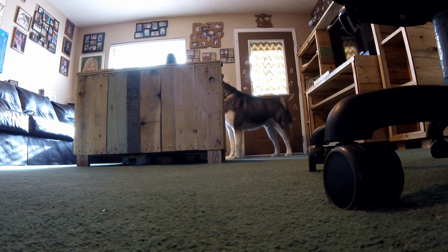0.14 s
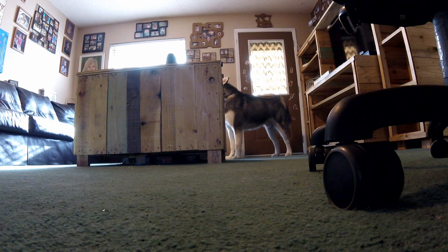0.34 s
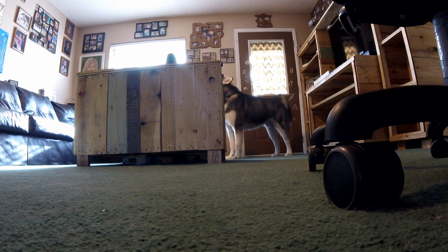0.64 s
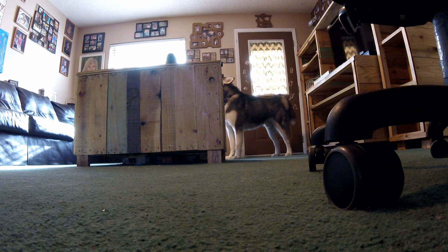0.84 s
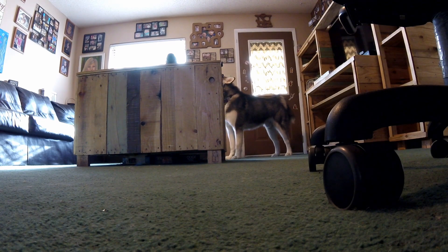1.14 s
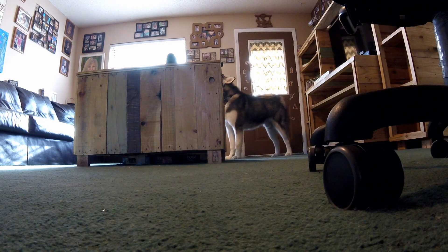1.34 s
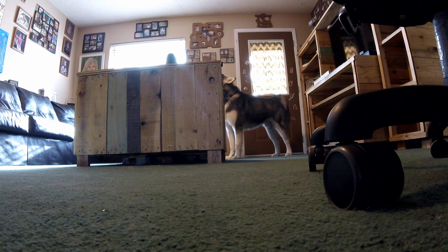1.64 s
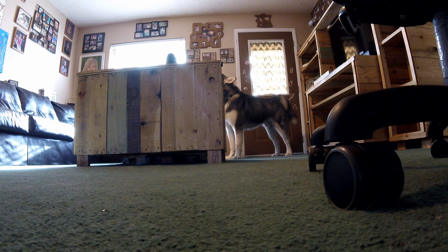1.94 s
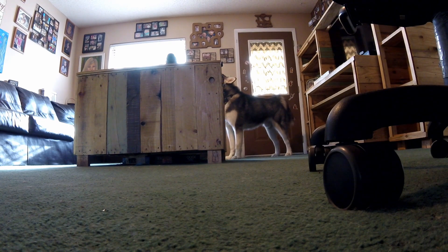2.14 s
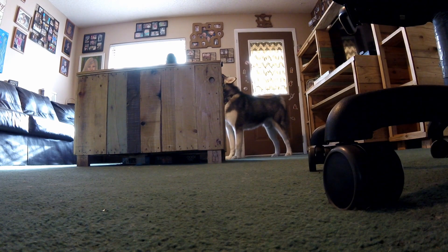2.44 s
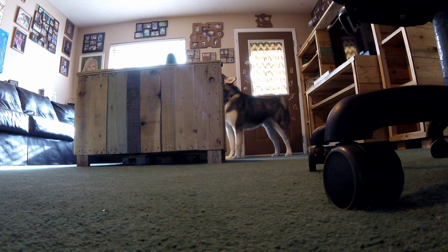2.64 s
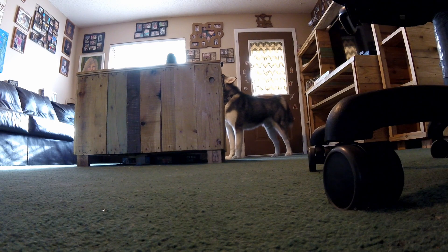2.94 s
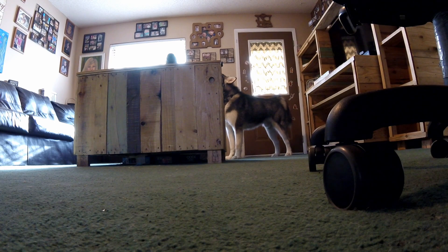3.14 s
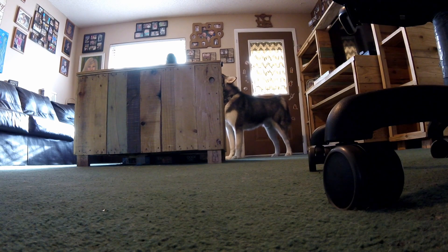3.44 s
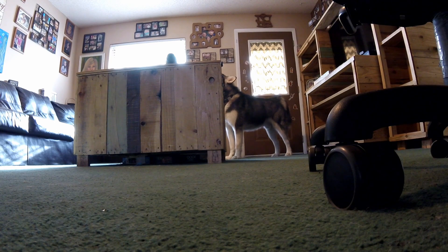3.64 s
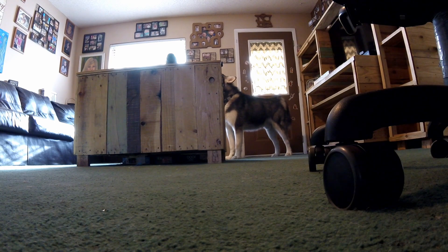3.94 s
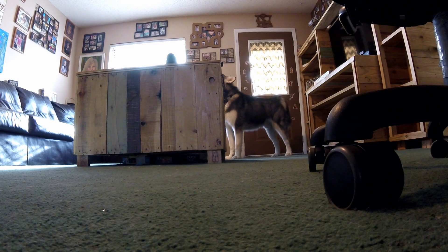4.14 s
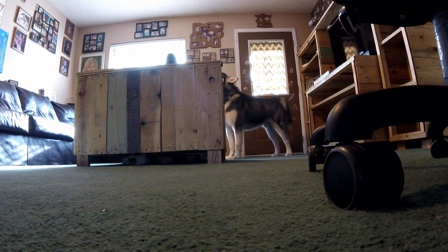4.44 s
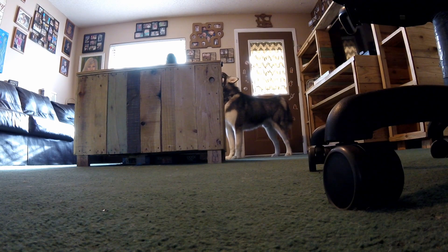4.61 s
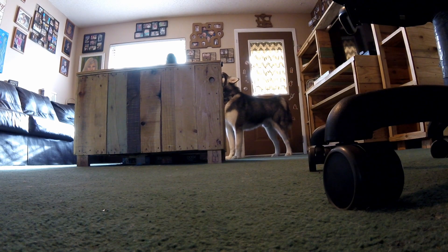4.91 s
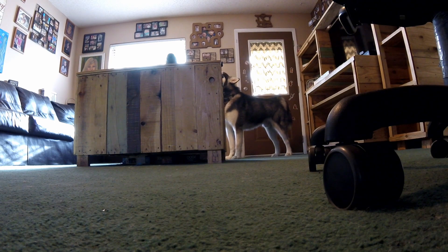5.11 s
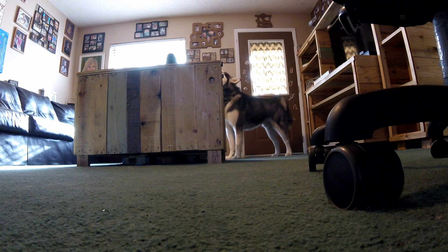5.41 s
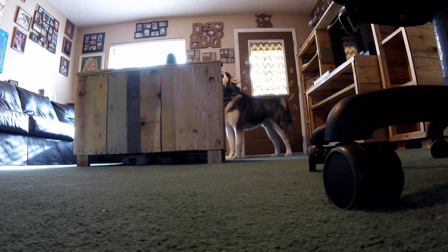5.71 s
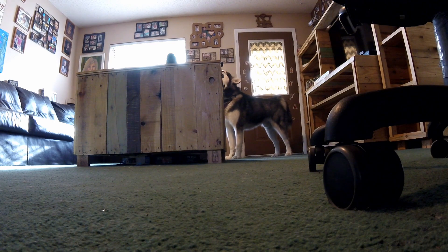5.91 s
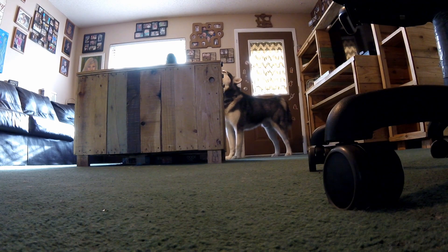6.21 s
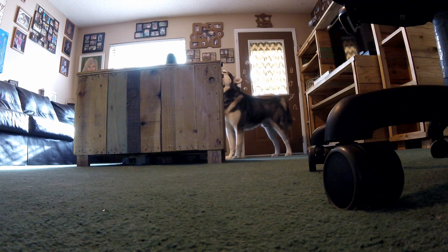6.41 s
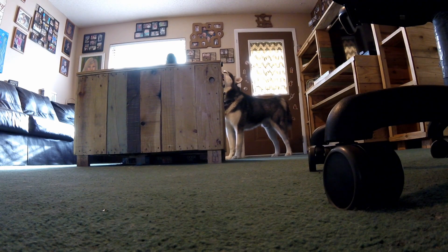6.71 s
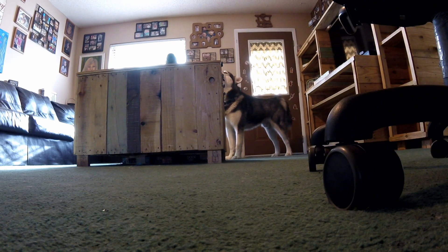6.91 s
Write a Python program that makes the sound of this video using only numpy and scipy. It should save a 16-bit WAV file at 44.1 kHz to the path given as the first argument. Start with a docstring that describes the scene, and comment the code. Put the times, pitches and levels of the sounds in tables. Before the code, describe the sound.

A large dog indoors howls long and high, pauses, then growls gruffly into a second, shorter howl that slides down, over low room rumble.

```python
"""A large dog across a carpeted living room, heard by a microphone on the floor over low rumble and faint hiss.
The first howl, a stack of harmonics with puffs of air, swoops up, holds and falls; a faint tick is near its start.
After a pause and another tick, a growl of uneven flaps ringing in chest, throat and mouth swells up.
It breaks into the second howl, where lines halfway between the harmonics add an undertone, and slides down.
Each strong harmonic swells and dips as it slides through the room's standing waves."""
import sys
import numpy as np
from scipy import signal
from scipy.fft import rfft, irfft, next_fast_len
from scipy.io import wavfile
from scipy.ndimage import uniform_filter1d

SR = 44100
rng = np.random.default_rng(int(sys.argv[2]) if len(sys.argv) > 2 else 0)


def generate_wav(signal):
    """Clip the signal to [-1, 1] and save it as 16-bit WAV at the path in sys.argv[1]."""
    frames = np.transpose(np.atleast_2d(signal))
    scaled = np.clip(frames, -1, 1) * 32767
    pcm = np.round(scaled).astype(np.int16)
    wavfile.write(sys.argv[1], SR, pcm)


N = 311346
TIME = np.arange(N) / SR


def undb(db):
    """Decibels to gain."""
    return 10 ** (np.asarray(db) / 20)


def unit(x):
    """Scale to rms 1."""
    return x / np.sqrt(np.mean(x ** 2))


def curves(table):
    """Each column of a table after the first as a curve over time."""
    s, *columns = np.transpose(table)
    return [np.interp(TIME, s, column) for column in columns]


def bumps(table):
    """Brief rises or dips in dB from rows of (time, length, height)."""
    return sum(db * np.exp(-((TIME - s) / length) ** 2) for s, length, db in table)


def sounding(table, fade_s):
    """1 over the span of a table, fading to 0 outside it."""
    inside_s = np.minimum(TIME - table[0][0], table[-1][0] - TIME)
    return np.clip(1 + inside_s / fade_s, 0, 1)


def gain_at(hz, colour):
    """Gain of a (Hz, dB) spectrum at the given frequencies."""
    points, db = np.transpose(colour)
    return undb(np.interp(np.log(hz + 1e-9), np.log(points), db))


def noise(colour):
    """Noise of rms 1 with the given spectrum."""
    size = next_fast_len(N)
    gain = gain_at(np.fft.rfftfreq(size, 1 / SR), colour)
    return unit(irfft(rfft(rng.standard_normal(size)) * gain, size)[:N])


def waver(rate_hz):
    """Smooth chance of rms 1, up to about the given rate."""
    lowpass = signal.butter(4, rate_hz, fs=SR, output="sos")
    return unit(signal.sosfilt(lowpass, rng.standard_normal(N)))


def ring(x, hz, width):
    """A resonance with steep skirts, its edges centred geometrically on hz."""
    low = np.sqrt(hz ** 2 + width ** 2 / 4) - width / 2
    bandpass = signal.butter(3, [low, low + width], "bandpass", fs=SR, output="sos")
    return signal.sosfilt(bandpass, x)


def room(x, wet_db, t60=0.61):
    """Direct sound and the dense echoes of a furnished room, as an impulse response of unit energy."""
    t = TIME[:SR * 3 // 4]
    echoes = rng.standard_normal(len(t)) * np.exp(-np.log(1000) * t / t60) * (t > .004)
    response = undb(wet_db) * echoes / np.sqrt(np.sum(echoes ** 2))
    response[0] = 1
    return signal.fftconvolve(x, response / np.sqrt(np.sum(response ** 2)))[:N]


# spectrum of the quiet room: freq_hz, relative_level_db
ROOM_TONE = [(28, -5.5), (43, 4), (58, -1.5), (90, -12.5), (140, -18.5), (280, -26), (600, -33.5),
             (3100, -54), (4300, -57.5), (5600, -54.5), (6700, -42), (9200, -58)]
ROOM_TONE_DB = -36


def room_tone():
    """Shaped noise: a wavering low rumble with faint hiss."""
    return noise(ROOM_TONE) * undb(ROOM_TONE_DB + 0.5 * waver(17.0))


# peaks and nulls of the room's standing waves at the floor: freq_hz, width_hz, height_db
STANDING_WAVES = [(243.4, 4.5, 11), (279.3, 2.1, 3.5), (297.6, 7.2, 6), (317.5, 2.63, -11), (389, 4, 4.5),
                  (438.7, 2.8, -21), (471.9, 11.1, -19), (497.6, 6, 9), (527.3, 7.4, 9), (558.4, 12.2, 9.5),
                  (597, 4.5, 9.5), (692, 2, -5.5), (719.5, 3.7, -17), (747.5, 22, -15), (770, 5.5, -21.5),
                  (861, 1.6, -18), (913.6, 11, -9), (945.5, 7.7, 10.5), (989, 1.5, 10.5), (1007, 2.9, 14),
                  (1033, 5.6, -19)]
ROOM_LAG_S = .008  # the room needs a moment to follow a sliding tone


def standing_waves(hz):
    """What the room adds to or takes from a tone as it slides, in dB."""
    grid = np.linspace(hz.min(), hz.max(), SR // 10)
    grid_db = sum(db * np.exp(-((grid - centre) / width) ** 2) for centre, width, db in STANDING_WAVES)
    db = np.interp(hz, grid, grid_db)
    lag = int(ROOM_LAG_S * SR)
    return uniform_filter1d(uniform_filter1d(db, lag), lag)


def trail(tone, hz, rough):
    """A held tone merges with its echoes; when it slides away they ring on at the old pitch and beat against it."""
    glide = uniform_filter1d(np.abs(np.gradient(np.log(hz))) * SR, SR // 8)
    share = np.clip(.4 * glide + .9 * rough, 0, .3)
    return tone * np.sqrt(1 - share ** 2) + share * room(tone, wet_db=22.0)


def strong_harmonics(phase, hz, level_db, second_db, third_db):
    """The three strong harmonics of the folds, each coloured by the standing waves, with the undertone."""
    body = undertone(phase)
    for k, db in enumerate([0, second_db, third_db], 1):
        body = body + undb(level_db + db + standing_waves(k * hz)) * np.sin(k * phase)
    return np.sqrt(2) * body


def overtones(phase, orders, gain):
    """Harmonics of the folds, weighted by gain(order); each swells and fades as the head moves in the room."""
    sway_db = 2.5
    steps = np.arange(len(phase)) / (SR // 9)
    knots = np.arange(int(steps[-1]) + 2)
    out = 0
    for k in orders:
        sway = undb(sway_db * np.interp(steps, knots, rng.standard_normal(len(knots))))
        out = out + sway * gain(k) * np.sin(k * phase + rng.uniform(0, 2 * np.pi))
    return np.sqrt(2) * out


# colour of the overtones through the throat: freq_hz, gain_db
TRACT = [(750.0, 11.5), (950.0, 12), (1050.0, 9), (1105.0, 6), (1165.0, -5.5), (1390.0, 2.4), (1480.0, -12),
         (1600.0, -0.5), (1750.0, 2), (1920.0, -2), (2030, -10), (2110.0, -2.5), (2180, -5.5),
         (2300.0, -3.5), (2440.0, -15.5), (2580.0, -21), (2900.0, -22), (3400, -39.5)]
# level of the throat's overtones: time_s, level_db
THROAT_LEVEL = [(0.0, -53), (0.17, -46.5), (0.42, -54), (0.86, -56), (1.3, -53), (1.9, -48), (2.3, -48.5),
                (2.8, -53), (3.1, -51.5), (3.42, -60.5), (3.6, -81), (4.72, -58), (5.5, -51.5), (6.0, -49),
                (6.3, -51.5), (7.06, -59.5)]
# the resonance that the lips move: time_s, freq_hz, height_db
LIPS = [(.2, 1950, 8.5), (.6, 2420, -3), (1.1, 2413, 24.5), (2.1, 2375, 5.5), (2.75, 2286, 16),
        (3.2, 2220, 10), (3.42, 1783, 10), (4.72, 2310, 15.5), (5.5, 2310, 16), (5.9, 2280, 11),
        (6.75, 2277, 11), (6.88, 1980, 24)]
# the fourth harmonic flares as each howl breaks downwards: time_s, length_s, height_db
FLARES = [(2.955, .03, 17), (6.25, .05, 15)]


def throat(phase, hz, on, halves):
    """Overtones above the third light up one after another as they slide through the resonances."""
    lips_hz, lips_db = (column[on] for column in curves(LIPS))
    lips_width_hz = 160
    flare = undb(bumps(FLARES)[on])

    def tract(k):
        lips = undb(lips_db * np.exp(-((k * hz[on] - lips_hz) / lips_width_hz) ** 2))
        return gain_at(k * hz[on], TRACT) * lips * (flare if k == 4 else 1)

    whole = overtones(phase[on], range(4, 14), tract)
    between = overtones(phase[on], [k + .5 for k in range(3, 9)], lambda k: tract(k) * (k / 7.5) ** 2)
    return undb(curves(THROAT_LEVEL)[0][on]) * (whole + halves * between)


# colour of the highest overtones through the muzzle: freq_hz, gain_db
MUZZLE = [(3500, -43.5), (4050, -15.5), (4230, -1.5), (4520, -4), (4750, -11.5), (5100, -9.5), (5550, -29),
          (5950, 6), (6400, -14.5), (6900, -37), (7300, -14), (7700, -25.5), (8100, -12.5), (8600, -41.5)]
# level of the muzzle's ring: time_s, level_db
MUZZLE_LEVEL = [(0, -76), (.2, -56.5), (1.3, -54.5), (2.5, -51.5), (3.5, -75), (4.72, -62), (5.7, -52.5),
                (6.2, -56), (6.7, -72)]


def muzzle(phase, hz, on, halves):
    """The highest overtones ring in the muzzle, pulsing every second cycle when the cycles alternate."""
    tones = overtones(phase[on], range(10, 38), lambda k: gain_at(k * hz[on], MUZZLE))
    pulsing = 1 + halves * np.sin(phase[on] / 2)
    return undb(curves(MUZZLE_LEVEL)[0][on]) * tones * pulsing


# spectrum of the breath: freq_hz, relative_level_db
AIR_COLOUR = [(1400, -8.5), (2200, 11), (3500, 4.5), (4900, 4), (5600, -2.5), (6200, 2), (8400, -8.5),
              (9500, -22.5)]


def air():
    """Turbulence in the dog's open mouth, each band fluttering on its own."""
    flutter_db = 4.5
    stream = noise(AIR_COLOUR)
    bands = [ring(stream, hz, 1000) * undb(flutter_db * waver(25)) for hz in range(1500, 9000, 1000)]
    return unit(sum(bands))


def breath(phase, rough, air_db):
    """Air and hoarse noise escape once a cycle, while the folds are open."""
    hoarse_hz, hoarse_width_hz, hoarse_db = 2100, 650, -8  # the mouth's resonance
    hoarse = unit(ring(rng.standard_normal(N), hoarse_hz, hoarse_width_hz))
    hoarse = undb(hoarse_db) * rough ** 2 * hoarse
    opening = (1 + np.sin(phase)) ** 2 / 2
    return ((undb(air_db) + puffs()) * air() + hoarse) * opening


# roughness of the folds, least while a high note is held: time_s, roughness_db
ROUGHNESS = [(.45, -27), (.62, -22), (1.1, -31), (2.8, -34.5), (2.95, -27), (4.75, -19.5), (5.25, -24),
             (6.03, -34), (6.14, -27.5), (7.06, -27)]
# the voice catches for an instant just after it finds its tone: time_s, length_s, height_db
CATCH = [(4.872, .009, -15)]
# each howl, before the room colours it:
# time_s, pitch_hz, level_db, second_over_first_db, third_over_first_db
FIRST_HOWL = [(0.0, 311, -41, 5.5, 0), (0.04, 275.2, -38, 6.5, -4.5), (0.17, 277.7, -37.5, 13.5, -3),
              (0.21, 283.4, -36, 2.5, 0), (0.27, 294, -30.5, -10.5, -7), (0.39, 305.2, -21.5, 10, -3.5),
              (0.5, 314, -15.5, -0.3, -16.5), (0.62, 325.2, -13, -5.5, -28),
              (0.72, 326.6, -11.5, -3.8, -35.5), (0.84, 332, -15, -5.5, -34.5),
              (1.0, 336.6, -7.5, -19.5, -42), (1.15, 340.9, -9.5, -10.5, -35),
              (1.42, 344.4, -8, -9.5, -23.5), (1.64, 347.7, -3, -13, -35), (1.88, 353.8, -4, -14, -37),
              (2.19, 344.8, -3, -12.5, -26), (2.4, 349.7, -2.5, -15, -28.5), (2.55, 342.4, -7, -10, -12.5),
              (2.66, 336, -6.5, -15, -28.5), (2.78, 328.8, -12, -5.5, -13.5), (2.88, 326.1, -11, -2.5, -19),
              (2.96, 281.8, -25.5, 0.2, -12), (3.08, 260.7, -23.5, -13, -4.5), (3.22, 249.6, -35, 6.5, 7),
              (3.36, 231, -36.5, 8, 7), (3.48, 218, -35, 6.5, -8), (3.6, 216.3, -59, 12.5, 5)]
SECOND_HOWL = [(4.72, 257, -27, 7, 4), (4.77, 284, -16.5, 1.5, -17.5), (4.84, 281.2, -16, 0, -9.5),
               (4.872, 275, -14, -3.5, -11), (4.91, 287.4, -17.5, 6.5, -8), (5.18, 290.1, -27, 15.5, 3.5),
               (5.32, 286.3, -17, -1, -9), (5.42, 294.6, -30.5, 10, -3.5), (5.5, 302.8, -13, -13.5, 2.7),
               (5.62, 310.9, -10, -8.5, -9.5), (5.71, 304.8, -10.5, -12, -4.5),
               (5.86, 322.8, -8.5, -3, -24.5), (6.02, 316.6, -8, -1.9, -19), (6.08, 304.4, -13, -8.5, -6),
               (6.15, 290.6, -24, -13.5, -10.5), (6.2, 272.6, -18, -6.5, -18), (6.29, 253.1, -20, -14.5, 3),
               (6.4, 243.5, -32.5, 3, 12.5), (6.52, 238.8, -28.5, 21.5, 5.5),
               (6.62, 226.5, -27.5, -2.5, 1.5), (6.73, 213.7, -33.5, 6.5, -1), (6.85, 202.7, -27, 0, -23.5),
               (7.06, 190.1, -30, 0.5, -14)]


def howl(table, air_db, quaver=0.0018, jitter=.05, shimmer=0.55):
    """Vibrating folds give harmonics and let out a stream of air. Returns (body, treble)."""
    hz, level_db, second_db, third_db = curves(table)
    rough = undb(curves(ROUGHNESS)[0])
    unsteady_hz = hz * (1 + quaver * waver(20) + jitter * rough * waver(110))
    phase = 2 * np.pi * np.cumsum(unsteady_hz) / SR
    voiced = sounding(table, 0.03) * undb(bumps(CATCH)) * (1 + shimmer * rough * waver(360))
    body = strong_harmonics(phase, hz, level_db, second_db, third_db)
    on = voiced != 0
    halves = half_lines()[on]
    high = np.zeros(N)
    high[on] = throat(phase, hz, on, halves) + muzzle(phase, hz, on, halves)
    treble = (high + breath(phase, rough, air_db)) * voiced
    return trail(body * voiced, hz, rough), treble


# faint ticks: start_s, level_db
TICKS = [(.041, -46), (4.018, -55)]


def ticks():
    """Tiny clicks: noise that starts at once and dies away within milliseconds."""
    envelope = sum(undb(db) * np.exp(-np.abs(TIME - s) / .003) * (TIME >= s) for s, db in TICKS)
    return envelope * noise([(2500, 6.5), (4000, -21.5), (7000, -13.0), (10000, -15.0)])


# puffs of air as the first howl gets going, before they sputter: time_s, length_s, level_db
PUFFS = [(.06, .05, -49), (.22, .15, -55), (.58, .12, -54), (.74, .08, -51), (.85, .09, -47),
         (.98, .05, -49)]


def puffs():
    """Strength of the short, sputtering puffs of air before the voice settles."""
    sputter = undb(3 * waver(45) - 1)
    return sputter * sum(undb(db) * np.exp(-(2 * (TIME - s) / length) ** 2) for s, length, db in PUFFS)


# the growl sets in, swells to its peak while the flapping speeds up, and dies under the howl
GROWL_START_S, GROWL_PEAK_S, GROWL_END_S = 4.166, 4.647, 4.75
GROWL_ATTACK_S, GROWL_SAG_DB_PER_S, GROWL_RELEASE_S = 0.06, 60, 0.057
FLAP_HZ, FLAP_RISE_HZ_PER_S, IRREGULARITY_PER_S = 75, 105, .25
BARK_S, BARK_LENGTH_S = 4.25, 0.056  # a short bark early in the growl
# resonances, one list per part of the growl: freq_hz, width_hz, relative_level_db
GROWL_MODES = [
    [(84.4, 61, -1)],
    [(240, 160, 0)],
    [(376, 112, 0)],
    [(568.5, 72, 3.5)],
    [(687, 102, 0)],
    [(946, 120, 0)],
    [(1900, 480, -6), (2205, 240, 3)],
    [(3030, 180, -5), (4560, 210, 5.5), (6370, 300, -2.5)],
]
# flutter, chest, low throat, high throat, bark, mouth, rasp, muzzle:
# peak_level_db, swell_db_per_s, lift_in_bark_db
GROWL_PARTS = [(-43.5, -42, -5), (-24, 16, -7), (-16, 24, -3.5), (-15, 61.5, 6), (-31.5, 15, 9),
               (-29.5, 74.5, 6), (-47, 35.5, 2), (-56, 35, 2)]


def growl(hiss=0.005):
    """Slack folds flap unevenly and ever faster; each flap rings chest, throat and mouth in shifting shares."""
    scatter_db, patchy_db, echo_db = 3, 1, 5
    growling_s = np.clip(TIME, GROWL_START_S, GROWL_END_S)
    age_s = growling_s - GROWL_START_S
    hz = FLAP_HZ + FLAP_RISE_HZ_PER_S * age_s
    cycles = np.cumsum(hz * (1 + IRREGULARITY_PER_S * age_s * waver(70))) / SR
    flaps = np.diff(np.floor(cycles), prepend=0) * undb(scatter_db * rng.standard_normal(N))
    breath_noise = hiss * np.exp(-3 * (cycles % 1)) * rng.standard_normal(N)
    source = room(flaps + breath_noise, wet_db=echo_db)
    bark = np.exp(-((TIME - BARK_S) / BARK_LENGTH_S) ** 2)
    before_peak = np.maximum(GROWL_PEAK_S - growling_s, 0)
    after_peak = np.maximum(growling_s - GROWL_PEAK_S, 0)
    out = 0
    for modes, (peak_db, swell, bark_db) in zip(GROWL_MODES, GROWL_PARTS):
        band = sum(undb(mode_db) * ring(source, centre, width) for centre, width, mode_db in modes)
        steady = band / np.sqrt(uniform_filter1d(band ** 2, SR // 14) + 1e-18)  # short-term rms 1
        db = peak_db - swell * before_peak - GROWL_SAG_DB_PER_S * after_peak
        out = out + undb(db + bark_db * bark + patchy_db * waver(14)) * steady
    attack = np.clip((TIME - GROWL_START_S) / GROWL_ATTACK_S, 0, 1)
    return out * attack * np.exp(-np.maximum(TIME - GROWL_END_S, 0) / GROWL_RELEASE_S)


# single hard flaps within the growl: start_s, strength_db
HARD_FLAPS = [(4.168, -28), (4.333, -15), (4.436, -13), (4.498, -12), (4.529, -13), (4.562, -11),
              (4.621, -7), (4.699, -11)]
# what a hard flap rings with, before the low-pass dulls it: freq_hz, ring_down_s, level_db
FLAP_MODES = [(410, 0.0084, -8.5), (582.3, 0.031, -8), (690, 0.0076, -20), (990, 0.0048, -19.5)]


def hard_flaps():
    """Single hard slaps of the folds knock dully on the throat's resonances."""
    t = TIME[:SR // 10]
    knock = sum(undb(db) * np.exp(-t / decay) * np.sin(2 * np.pi * hz * t) for hz, decay, db in FLAP_MODES)
    knock = signal.sosfilt(signal.butter(8, 900, fs=SR, output="sos"), knock)
    slaps = np.zeros(N)
    for s, db in HARD_FLAPS:
        slaps[int(s * SR)] = undb(db)
    return room(signal.fftconvolve(slaps, knock)[:N], wet_db=-7)


# lines halfway between the overtones while the cycles alternate: time_s, gain_over_overtones_db
HALF_LINES = [(4.7, -40), (4.85, -9), (5.5, 0), (5.72, -1), (5.85, -26)]


def half_lines():
    """Strength of the alternation between cycles, as heard among the overtones."""
    return undb(curves(HALF_LINES)[0])


UNDERTONE_S, UNDERTONE_ATTACK_S, UNDERTONE_HOLD_S = 4.82, 0.12, 0.38
UNDERTONE_DB, UNDERTONE_FADE_DB_PER_S = -27.5, 37.5


def undertone(phase):
    """As the growl breaks into tone, alternating cycles put lines at 1/2, 3/2 and 5/2 of the pitch."""
    age = TIME - UNDERTONE_S
    fading_s = np.maximum(age - UNDERTONE_ATTACK_S - UNDERTONE_HOLD_S, 0)
    attack = np.clip(age / UNDERTONE_ATTACK_S, 0, 1)
    gain = attack * undb(UNDERTONE_DB - UNDERTONE_FADE_DB_PER_S * fading_s)
    lines = np.sin(3 * phase / 2) + undb(-23.0) * np.sin(phase / 2) + undb(-19.0) * np.sin(5 * phase / 2)
    return gain * lines


def scene():
    """The dog stands across the room; its overtones arrive with strong echoes, slightly to one side."""
    body1, high1 = howl(FIRST_HOWL, air_db=-75.5)
    body2, high2 = howl(SECOND_HOWL, air_db=-81.0)
    low = room_tone() + body1 + body2 + growl() + hard_flaps()
    high = room(high1 + high2 + ticks(), wet_db=-1, t60=.42)
    pan_db = -1.1  # first channel over second
    return low + high * undb(np.array([[pan_db], [-pan_db]]) / 2)


KNEE_DB, WINDOW_S = -12, .5  # level where the gain starts to sink, span over which it is averaged


def gain_control(x):
    """The gain sinks as the sound gets louder, so the rumble ducks under the howls."""
    window = np.hanning(int(WINDOW_S * SR))
    power = np.abs(signal.fftconvolve(np.mean(x ** 2, axis=0), window / window.sum(), "same"))
    return x / np.sqrt(np.sqrt(1 + power / undb(KNEE_DB) ** 2))


TOP_HZ = 9400


def record(dry):
    """The microphone's gain rides the level, and a steep low-pass cuts the top."""
    lowpass = signal.ellip(8, .2, 70, TOP_HZ, fs=SR, output="sos")
    return signal.sosfilt(lowpass, gain_control(dry))


dry = scene()
out = record(dry)
generate_wav(out)
```